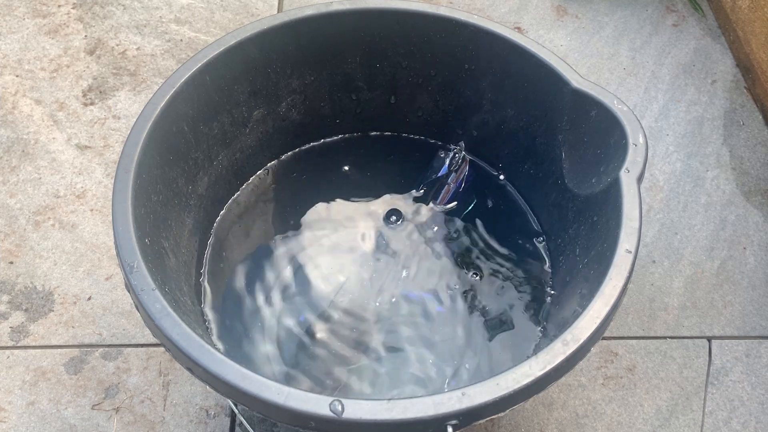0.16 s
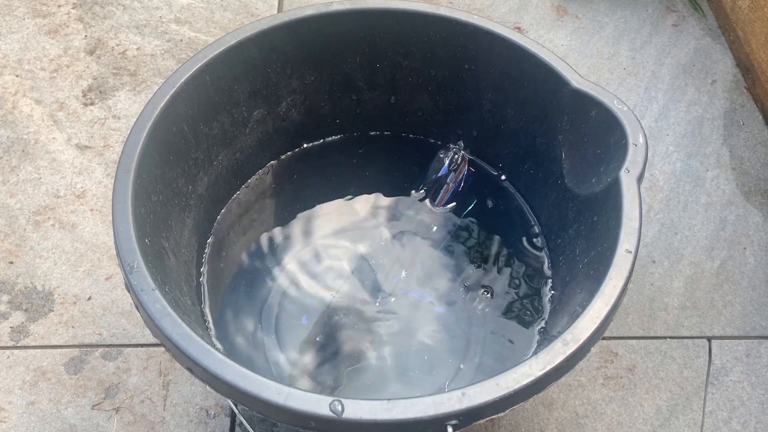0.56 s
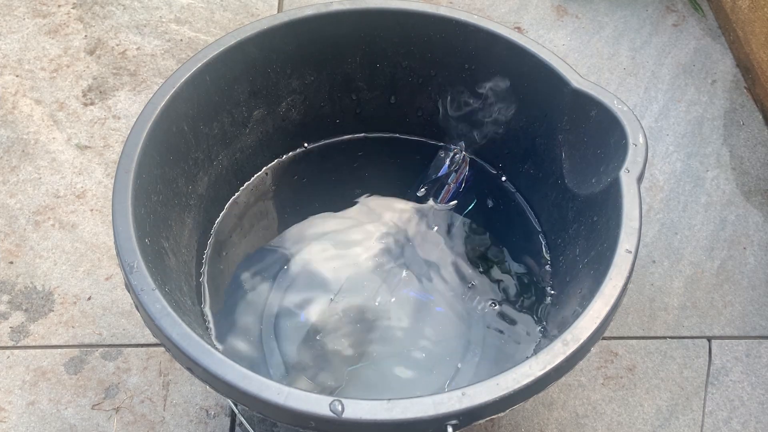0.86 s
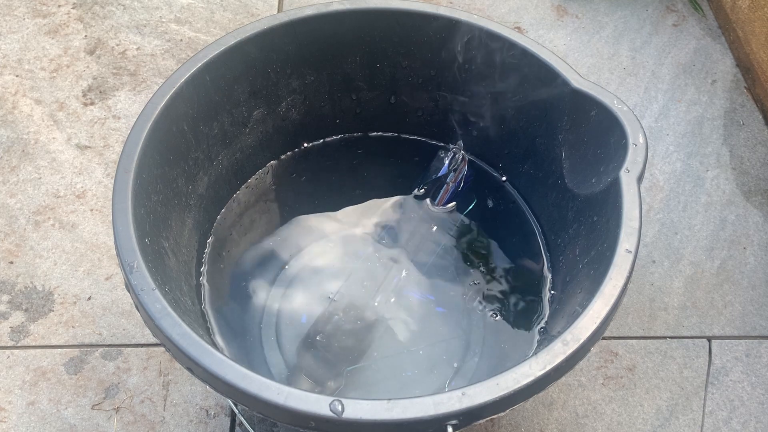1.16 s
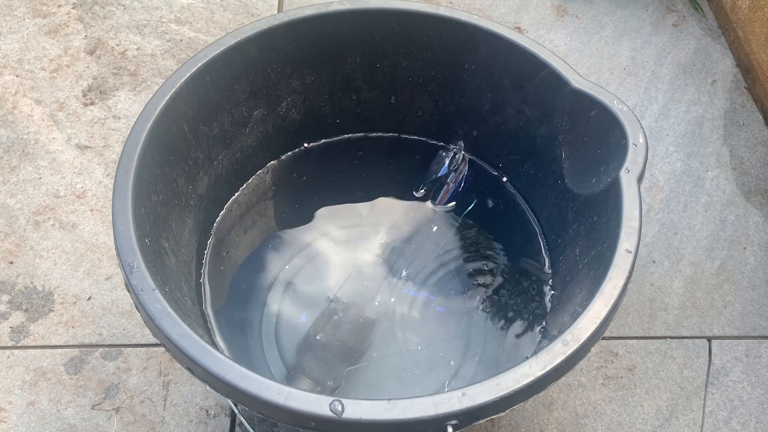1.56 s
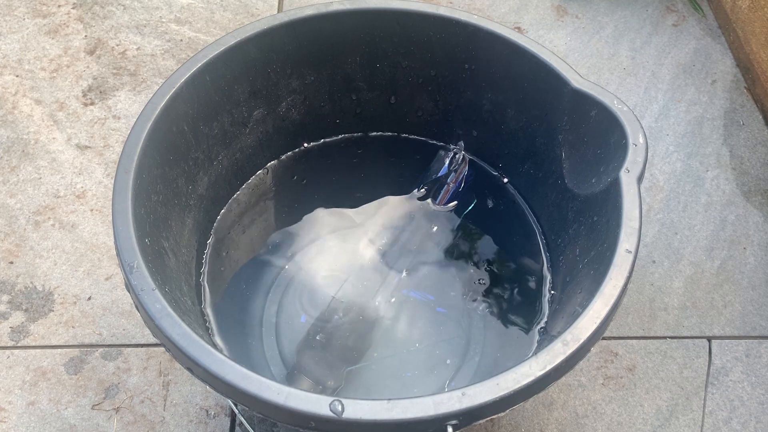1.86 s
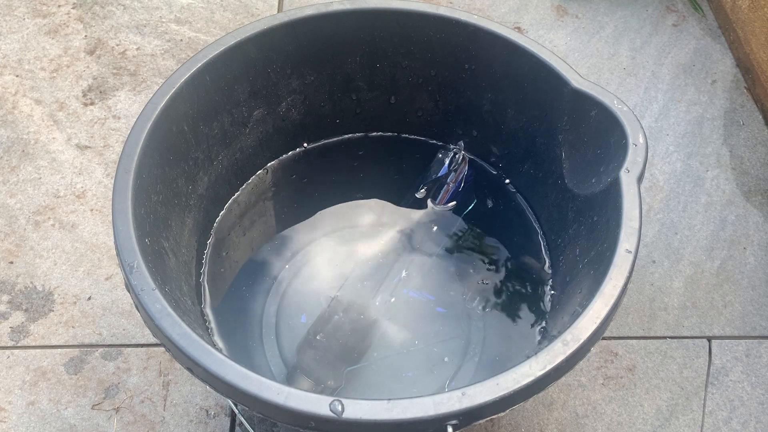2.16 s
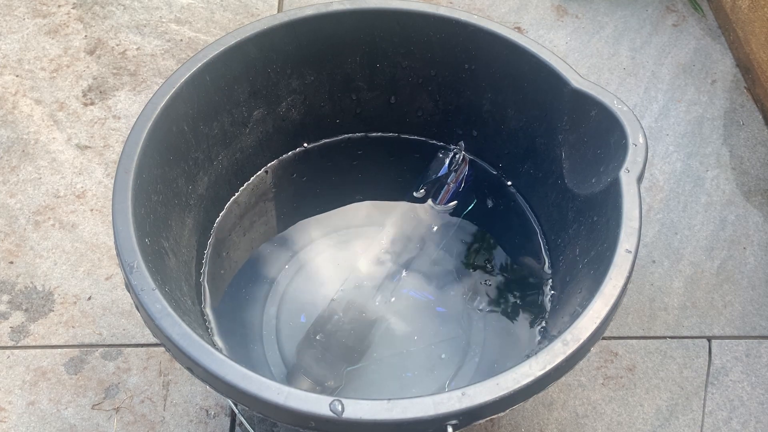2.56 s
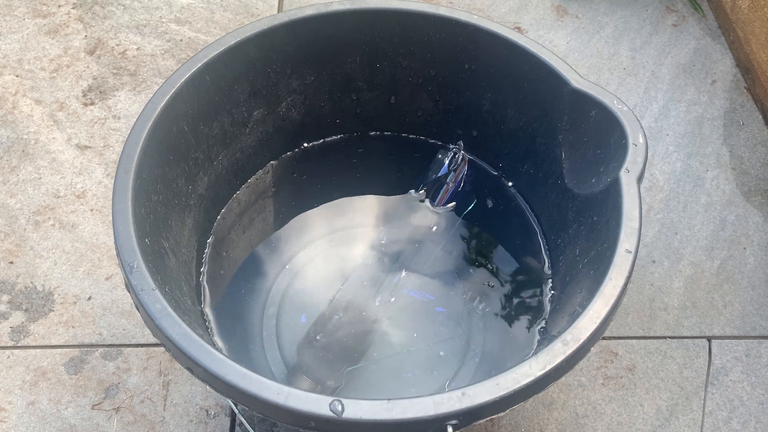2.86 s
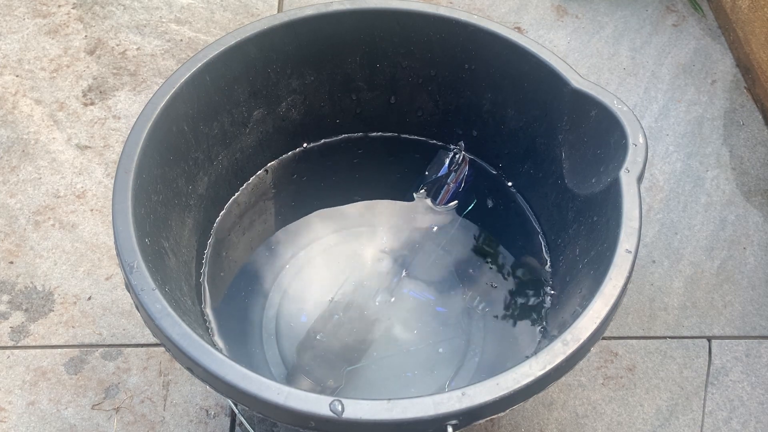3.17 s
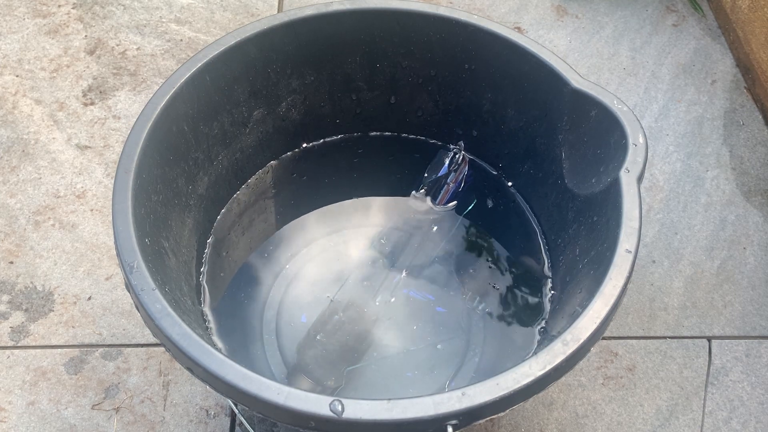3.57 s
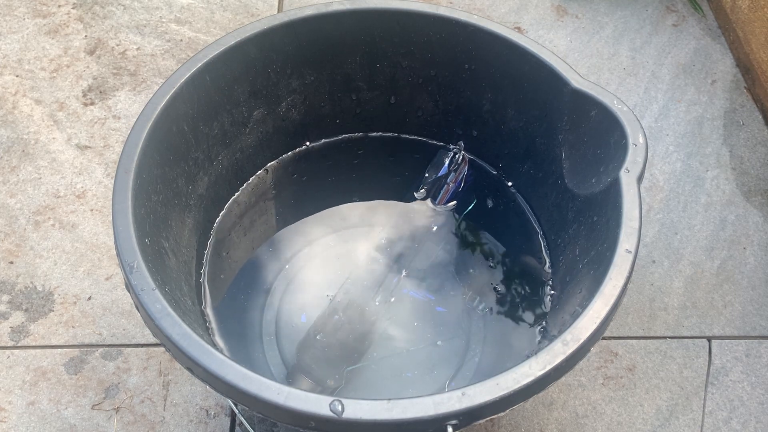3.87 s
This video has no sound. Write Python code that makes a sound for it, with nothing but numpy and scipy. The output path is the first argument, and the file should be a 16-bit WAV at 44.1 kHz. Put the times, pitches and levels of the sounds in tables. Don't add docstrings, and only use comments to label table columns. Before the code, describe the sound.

From the very start a dense, bright fizz fills the foreground: gas bubbles bursting and fine spray hissing as metal reacts on water in a plastic bucket, rough and rapidly fluttering, with a slight hollow ring. Far engines hum low and road rumble swells softly behind, strongest from 1 to 2.6 s; a van pulls away faintly at about 0.5 to 1.2 s, rising slightly in pitch. Small wet flares slap at 0.6 and 1.1 s, with softer spits around 1.9 to 2.4 s. A distant small bird gives thin, quick falling whistles between 1.75 and 3 s. Harder spits come at 3.1, 3.2 and 3.4 s as a thin, high gas jet opens. A tiny snap clicks at 3.52 s, and at 3.97 s ignition cracks sharply with a brief low, hollow bucket thump. Close handheld phone outdoors, slightly wide stereo, dull above the high treble.

```python
import sys
import numpy as np
from scipy import signal
from scipy.fft import rfft, irfft, next_fast_len
from scipy.io import wavfile

SR = 44100
rng = np.random.default_rng(int(sys.argv[2]) if len(sys.argv) > 2 else 0)


def log_audio(samples):
    frames = np.atleast_2d(samples).T
    limited = np.clip(frames, -1, 1)
    pcm = np.round(limited * 32767).astype(np.int16)
    wavfile.write(sys.argv[1], SR, pcm)


def level_to_linear(level):
    exponent = np.asarray(level, float) / 20
    return 10 ** exponent


N = 177237
FFT_SIZE = next_fast_len(N + 8192)
HZ = np.fft.rfftfreq(FFT_SIZE, 1 / SR)
TIME = np.arange(N) / SR

# [f/Hz, density level/dB]
MIST_COLOUR = [(12800, -11), (13800, 4), (14500, 0), (15800, 2)]
SPRAY_COLOUR = [(7700, -25), (8050, -1.5), (9100, 1), (9800, 1), (11000, 0), (12200, -0.5), (13100, 0),
                (14500, -24)]
SPIT_COLOUR = [(3200, -26), (4000, -0.5), (4700, -6), (5400, -1), (6000, 1.5), (6600, -3), (7300, -0.5),
               (7900, -5), (8200, -24)]
BURST_COLOUR = [(1500, -14.5), (2200, -7), (2900, -2.5), (3500, 0), (4000, 0.5), (4500, -10.5), (5200, -33)]
CHURN_COLOUR = [(120, -16), (250, -2.5), (320, -3.5), (480, 1), (650, -2), (900, 1), (1500, -2.5),
                (2100, -3.5), (3200, -11)]
# [centre t/s, length t/s, spray level/dB, mist level/dB]
SKATES = [(.03, 0.21, -41, -52), (.17, 0.13, -41, -46), (.44, 0.4, -45.5, -52.5), (.66, 0.39, -45.5, -52),
          (1.05, 0.93, -46, -55), (1.6, 0.96, -49, -53), (2.0, .15, -50, -50), (2.3, 1, -48, -54),
          (2.54, .15, -47, -50), (2.82, 0.34, -49, -58), (3.42, 0.95, -46, -51), (3.83, 0.52, -43.5, -49)]
SPRAY_REST_DB, MIST_REST_DB = -45.5, -49.5
# [t/s, level/dB]
VIGOUR = [(0, -59.5), (.16, -60), (.22, -50), (.5, -52.5), (.58, -45.5), (.68, -49.5), (1.02, -45.5),
          (1.12, -49), (1.44, -50), (2.56, -50), (2.68, -56), (2.86, -52.5), (2.93, -57), (3.17, -59),
          (3.6, -56), (3.72, -60), (3.84, -62.5), (3.96, -51.5)]
MEAN_VIGOUR_DB = -51
SPIT_DB, SPIT_FOLLOWS = -49, 0.64
CHURN_DB, CHURN_FOLLOWS = -56.5, 0.5
# [f/Hz, width f/Hz, level/dB]
BUCKET_MODES = [(2917, 53, -14), (2611, 110, -18.5), (4015, 120, -8.5), (6050, 210, -9), (862, 48, -21.5)]
# [centre t/s, length t/s, level/dB]
HIGH_ENGINE = [(.25, .12, -57), (.52, 0.44, -55.5), (1.0, .1, -49), (1.13, .12, -57), (1.42, 0.51, -51.5),
               (1.66, 0.13, -48), (1.78, 0.11, -55), (2.04, 0.13, -48.5), (2.22, 0.51, -48.5),
               (2.42, .2, -51), (2.58, 0.28, -50.5), (2.86, 0.19, -61.5), (3.4, 0.48, -60)]
LOW_ENGINE = [(.18, 0.22, -55), (1.44, 0.28, -55), (1.78, .35, -58), (2.04, .14, -53), (2.25, .2, -55),
              (2.47, 0.22, -55), (2.82, 0.49, -49.5), (3.33, 0.58, -50), (3.65, 0.62, -54.5),
              (3.9, .14, -54)]
# [f/Hz, density level/dB]
ROAD_SWELL = [(0, -66.5), (.3, -61), (1.0, -56), (1.9, -55.5), (2.6, -57.5), (3.02, -66), (3.24, -56.5),
              (3.81, -62.5), (4, -60)]
ROAD_COLOUR = [(22, -25), (30, -23), (42, -2.5), (78, 4), (120, 1), (170, -9), (220, -8), (280, -21.5),
               (400, -38)]
# [centre t/s, length t/s, level/dB]
VAN = [
    (.62, .25, -60),
    (.95, 0.56, -60),
]
# [t/s, release t/s, spit gain level/dB, water gain level/dB]
FLARES = [
    (.59, 0.12, -1, 2),
    (1.09, 0.037, -0.5, 6),
    (1.93, 0.17, 0.5, -1),
    (2.2, 0.13, 1.5, 0),
    (2.37, 0.21, -1.5, -2),
    (3.09, 0.089, 6.5, 2.5),
    (3.184, 0.15, 7, 2.5),
    (3.39, 0.25, 5, 0.5),
]
# [t/s, length t/s, start f/Hz, end f/Hz, level/dB]
BIRD = [
    (1.763, .04, 7270, 6750, -44),
    (1.985, 0.09, 7050, 6400, -41.5),
    (2.075, .068, 6140, 5300, -40),
    (2.22, .035, 5350, 4950, -38),
    (2.506, 0.071, 7150, 6450, -41.5),
    (2.595, 0.037, 6350, 6000, -42),
    (2.728, 0.083, 7080, 6430, -39.5),
    (2.829, 0.076, 6400, 5610, -42),
    (2.956, 0.04, 6050, 5550, -45),
    (2.99, .03, 5500, 5100, -44),
]
# [f/Hz, density level/dB]
JET_COLOUR = [(3900, -22), (4400, -5), (5300, 2), (5900, -18)]
JET_S, JET_RISE_S, JET_DB = 3.05, 0.15, -51
# [t/s, f/Hz, peak level/dB, t60 t/s]
POP = [(3.524, 6080, -26.5, 0.004), (3.5253, 3800, -30.5, 0.0047), (3.9668, 5000, -23, 0.0095),
       (3.969, 5260, -22.5, 0.0083), (3.9688, 2700, -34, .012), (3.9672, 1870, -40, 0.017),
       (3.968, 1450, -41, 0.023), (3.9691, 1012, -35, 0.049), (3.9722, 636, -28, 0.029),
       (3.9733, 360, -31, 0.043), (3.979, 100, -28.5, 0.071)]
# [f/Hz, phase/rad]
PORT_LEAD = [(0, 0), (800, 3), (1300, 1.67), (2200, 1.76), (3000, 3.0), (3500, 3.7), (4500, 3.7),
             (10000, 3.8), (16000, 3.45)]
PORT_LAG_S = 10.3 / 44100
# [f/Hz, level/dB]
PORT_BALANCE = [(300, 0), (550, -1.5), (900, -2.5), (2000, -3.5), (3000, -2.5), (3700, 0)]
# [f/Hz, share/0-1]
PORT_SCATTER = [(150, 0.5), (300, 0.47), (700, 0.62), (1000, 1), (1500, 0.37), (3000, 0.47), (4300, 0.31),
                (8000, 0.1), (16000, 0.14)]


def on_hz(table):
    hz, value = np.transpose(table)
    return np.interp(np.log(HZ + 1), np.log(hz + 1), value)


def on_time(table):
    s, level = np.transpose(table)
    return np.interp(TIME, s, level)


def unit(x):
    return x / np.sqrt(np.mean(x ** 2))


def walk(rate):
    return np.interp(TIME * rate, np.arange(400), 1.22 * rng.standard_normal(400))


def filtered(x, gain):
    return irfft(rfft(x, FFT_SIZE) * gain, FFT_SIZE)[..., :N]


def swells(table, rest_db):
    s, length, *columns = np.transpose(table)
    t = TIME[::64]
    bump = np.cos(np.pi * np.clip((t[:, None] - s) / length, -0.5, 0.5)) ** 4
    curves = []
    for rest, db in zip(rest_db, columns):
        power = level_to_linear(2 * rest) + bump @ level_to_linear(2 * db)
        curves.append(np.interp(TIME, t, 10 * np.log10(power)))
    return curves


def bubbles(colour, surge_db, share, scatter_db, flicker_db, flicker_rate):
    happens = rng.random(N) < share
    strength = rng.standard_normal(N) * level_to_linear(scatter_db * rng.exponential(size=N))
    spectrum = rfft(happens * strength, FFT_SIZE) * level_to_linear(on_hz(colour))
    band = 2.5 * np.log2(HZ + 1)
    lowest, highest = [int(2.5 * np.log2(colour[i][0])) for i in (0, -1)]
    out = np.zeros(N)
    for centre in range(lowest, highest + 2):
        size = np.clip(1 - np.abs(band - centre), 0, 1)
        out += irfft(spectrum * size, FFT_SIZE)[:N] * level_to_linear(flicker_db * walk(flicker_rate))
    return unit(out) * level_to_linear(surge_db)


def small_lump(sputter, seethe):
    spray_db, mist_db = swells(SKATES, (SPRAY_REST_DB, MIST_REST_DB))
    spray = bubbles(SPRAY_COLOUR, 0.45 * seethe + 0.96 * sputter, 0.5, 1.6, 0.76, 85)
    mist = bubbles(MIST_COLOUR, 0.8 * seethe, 0.46, 0.9, 1.1, 85)
    return spray * level_to_linear(spray_db + 5) + mist * level_to_linear(mist_db + 6.5)


def bucket_air():
    out = np.zeros(N)
    for hz, width, db in BUCKET_MODES:
        b, a = signal.iirpeak(hz, hz / width, fs=SR)
        mode = signal.lfilter(b, a, rng.standard_normal(N))
        out += level_to_linear(db + 2.5 * walk(11)) * unit(mode)
    return out


def big_lump(sputter):
    vigour_db = on_time(VIGOUR)
    effort_db = vigour_db - MEAN_VIGOUR_DB
    flare_db, slap_db = flares()
    burst = bubbles(BURST_COLOUR, 0.87 * sputter, 0.3, 1.23, 0.63, 60)
    spit = bubbles(SPIT_COLOUR, 0.91 * sputter, 0.3, 1.57, 1.64, 50)
    churn = bubbles(CHURN_COLOUR, 1.25 * sputter, 0.1, 1.2, 1.0, 40)
    spit = spit * level_to_linear(SPIT_DB + SPIT_FOLLOWS * effort_db + flare_db + 2.5)
    churn = churn * level_to_linear(CHURN_DB + CHURN_FOLLOWS * effort_db + slap_db + 2)
    return spit + churn + (burst + bucket_air()) * level_to_linear(vigour_db + 0.15 * flare_db + 3.5)


def engines():
    high_db = swells(HIGH_ENGINE, [-67.5])[0] + walk(15)
    low_db = swells(LOW_ENGINE, [-64])[0] + 0.68 * walk(14)
    high = np.sin(2 * np.pi * np.cumsum(96 + 3.14 * walk(9)) / SR)
    low = np.sin(2 * np.pi * np.cumsum(55.5 + 2.5 * walk(7)) / SR)
    return unit(high) * level_to_linear(high_db) + unit(low) * level_to_linear(low_db)


def road():
    level = level_to_linear(on_time(ROAD_SWELL) + 4.5)
    colour = level_to_linear(on_hz(ROAD_COLOUR))
    middle, side = [unit(filtered(rng.standard_normal(N), colour)) * level for _ in range(2)]
    return middle + 0.16 * side * np.array([[1], [-1]])


def van():
    hz = 143 + 20 * TIME + 3 * walk(14)
    level_db = swells(VAN, [-90])[0] + 3 + 2.3 * walk(18)
    return np.sin(2 * np.pi * np.cumsum(hz) / SR) * level_to_linear(level_db)


def flares():
    s, release, *columns = np.transpose(FLARES)
    age = TIME[:, None] - s
    attack = np.clip(1 + age / 0.012, 0, 1)
    shape = attack * np.exp(-np.clip(age / release, 0, None) ** 2)
    return [shape @ db for db in columns]


def bird():
    out = np.zeros(N)
    for s, length, hz0, hz1, db in BIRD:
        u = np.linspace(0, 1, int(length * SR))
        start = int(s * SR)
        whistle = np.sin(2 * np.pi * np.cumsum(hz0 + (hz1 - hz0) * u) / SR)
        out[start:start + len(u)] += level_to_linear(db) * np.sin(np.pi * u) ** 0.8 * whistle
    echoes = rng.standard_normal(2000) * np.exp(-np.arange(2000) / 500) * level_to_linear(-33)
    out = out * level_to_linear(1.6 * walk(95) - 3)
    return out + signal.fftconvolve(out, echoes)[:N]


def gas_jet(sputter):
    opening = np.clip((TIME - JET_S) / JET_RISE_S, 0, 1)
    return bubbles(JET_COLOUR, sputter, 0.4, 1.4, 1.4, 50) * level_to_linear(JET_DB) * opening


def pop():
    out = np.zeros(N)
    for s, hz, db, t60 in POP:
        start = int(s * SR)
        t = TIME[:N - start]
        slip = np.clip(1 - 0.084 * t / t60, 0.5, 1)
        out[start:] += level_to_linear(db - 60 * t / t60) * np.sin(2 * np.pi * hz * t * slip)
    return out


def ports(moving, still):
    share = np.clip(on_hz(PORT_SCATTER), 0, 0.99)
    lead = np.interp(HZ, *np.transpose(PORT_LEAD))
    lag = np.exp(1j * (lead - 2 * np.pi * HZ * PORT_LAG_S))
    left = level_to_linear(on_hz(PORT_BALANCE) / 2)
    tilt = np.array([left, 1 / left])
    spectrum = rfft(moving, FFT_SIZE)
    direct = spectrum * np.sqrt(1 - share ** 2) + rfft(still, FFT_SIZE)
    direct = direct * [np.ones_like(lag), lag]
    detour = np.exp(-2j * np.pi * np.outer([0.021, 0.033], HZ))
    scattered = spectrum * share * tilt * detour
    wander = np.cumsum([walk(60), walk(60)], axis=1) * 150.04 / SR
    turned = irfft(scattered, FFT_SIZE)[:, :N] * np.cos(wander)
    turned += irfft(1j * scattered, FFT_SIZE)[:, :N] * np.sin(wander)
    return irfft(direct * tilt, FFT_SIZE)[:, :N] + turned


def scene():
    sputter = 0.12 * walk(35.3) + 1.33 * walk(85)
    seethe = 0.15 * walk(40.4) + 0.79 * walk(90)
    fizz = small_lump(sputter, seethe) + big_lump(sputter) + gas_jet(sputter)
    traffic = engines() + road() + van()
    return ports(fizz, bird() + pop()) + traffic


def roll_off(x):
    return signal.sosfilt(signal.butter(12, 17060, fs=SR, output="sos"), x)


def record(dry):
    mix = filtered(dry, HZ < 15735)
    return roll_off(mix)


dry = scene()
out = record(dry)
log_audio(out)
```